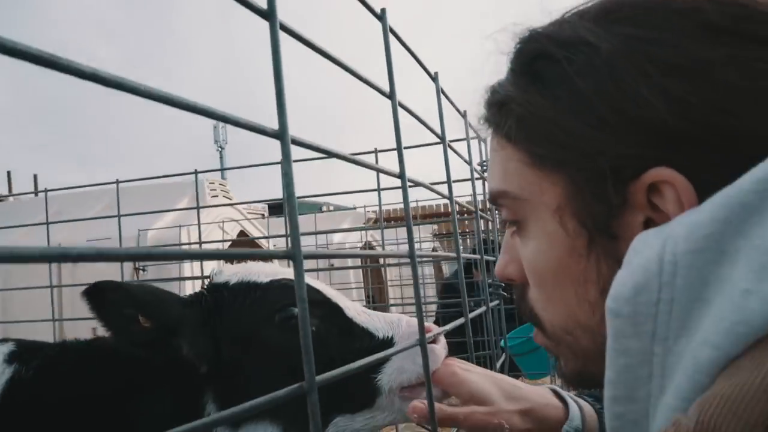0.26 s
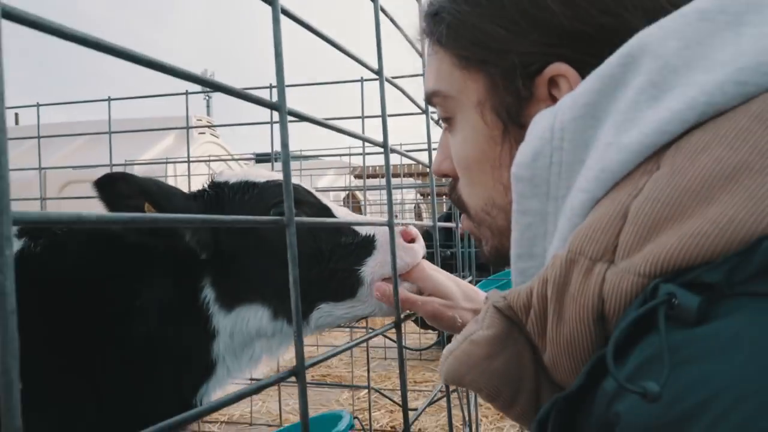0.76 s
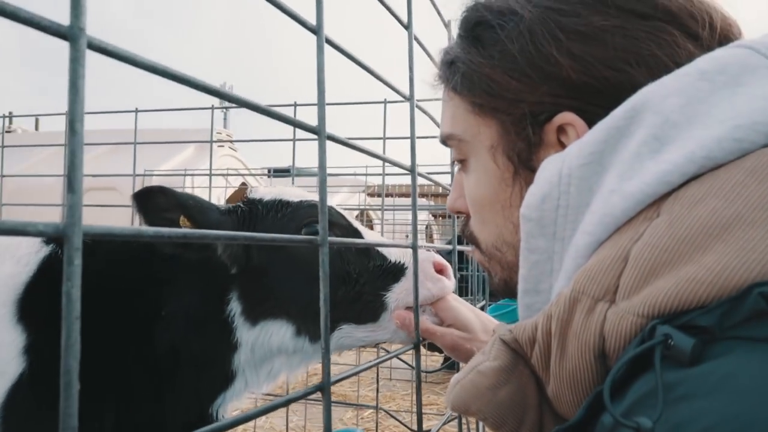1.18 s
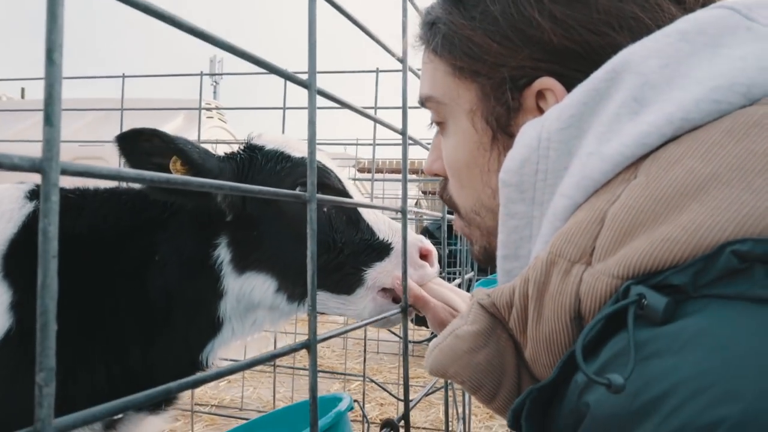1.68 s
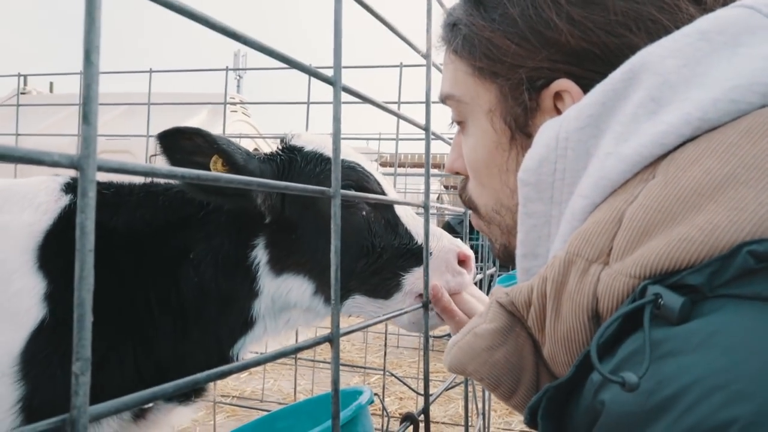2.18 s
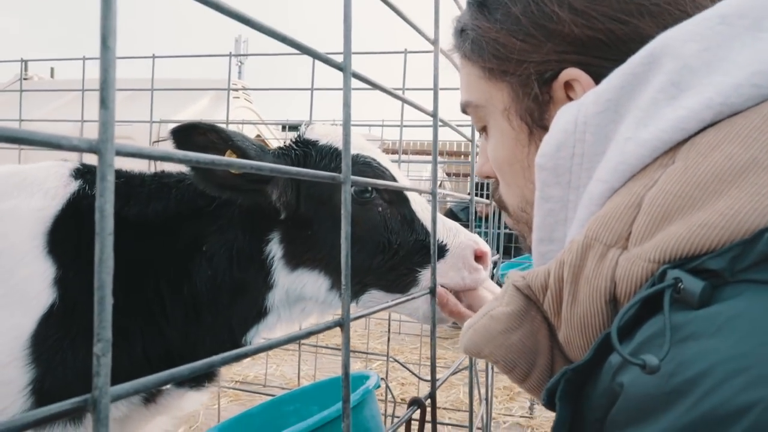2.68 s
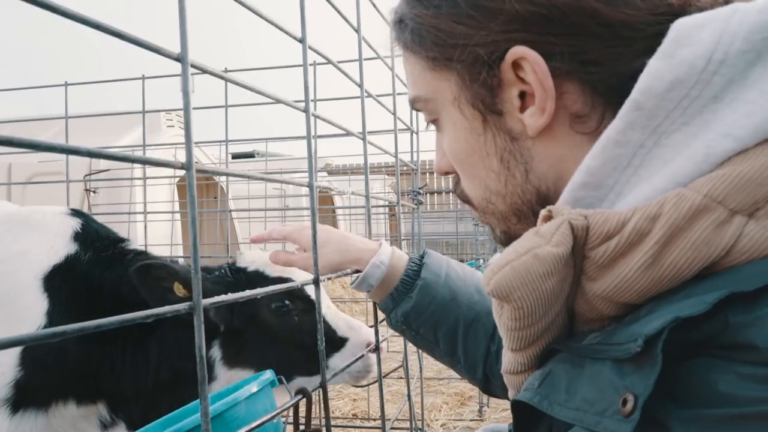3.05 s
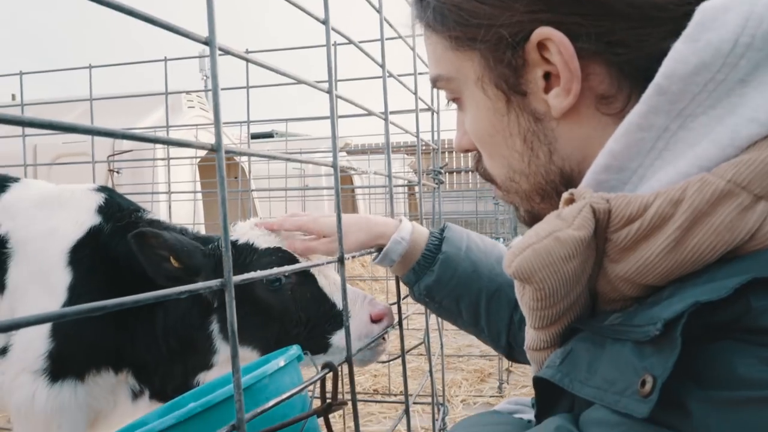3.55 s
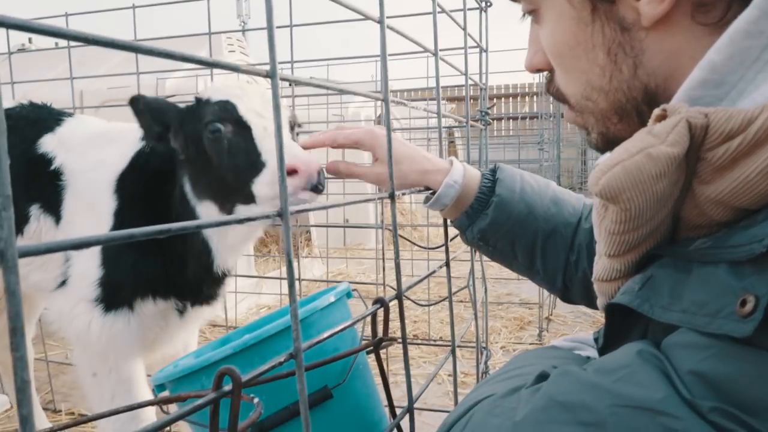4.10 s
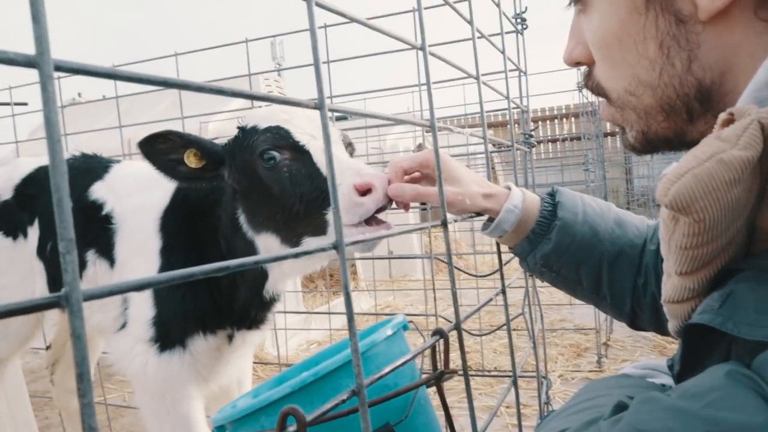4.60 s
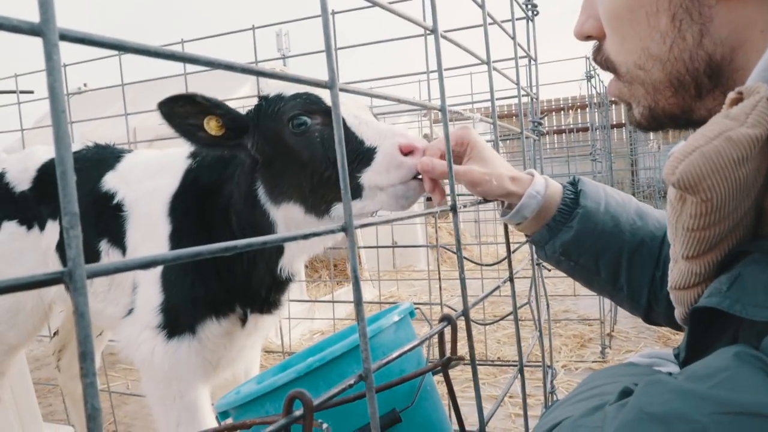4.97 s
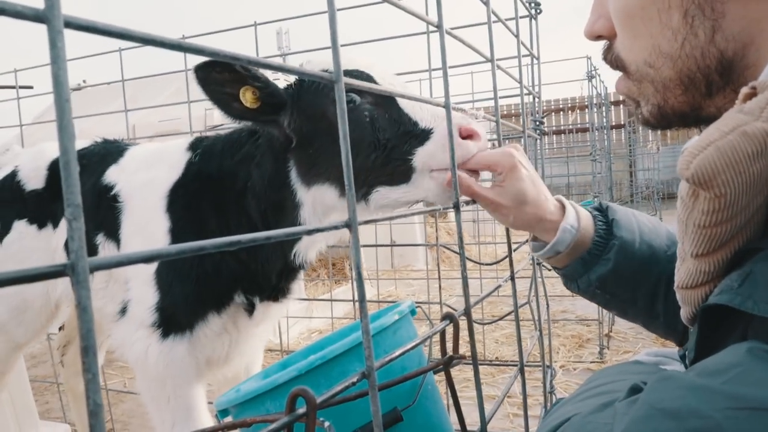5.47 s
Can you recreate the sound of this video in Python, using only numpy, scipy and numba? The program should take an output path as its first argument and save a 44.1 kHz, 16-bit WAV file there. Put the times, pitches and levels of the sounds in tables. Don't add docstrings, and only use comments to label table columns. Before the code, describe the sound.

Outdoor farmyard on a small bare camera microphone. Strong low wind buffeting opens, with hard fence-wire knocks and crisp straw ticks close by over a distant machine hum and rustling. Wind eases, a hoof thuds heavily, then a nearby calf creaks and gives one short, nasal, opening moo while the background ducks. Quiet yard noise returns.

```python
import sys
import numpy as np
from scipy import signal
from scipy.fft import rfft, irfft, next_fast_len
from scipy.io import wavfile
from scipy.ndimage import uniform_filter1d
from numba import njit

SR = 44100
rng = np.random.default_rng(int(sys.argv[2]) if len(sys.argv) > 2 else 0)


def volts(x):
    e = np.asarray(x, float) / 20
    return 10 ** e


def pcm_store(signal):
    levels = np.round(np.clip(np.atleast_2d(signal), -1, 1) * 32767)
    wavfile.write(sys.argv[1], SR, levels.astype(np.int16).T)


N = 253134
T = np.arange(N) / SR


def columns(table):
    s, *rest = np.transpose(table)
    return [np.interp(T, s, c) for c in rest]


def unit(x):
    return x / np.sqrt(np.mean(x ** 2))


def noise():
    return rng.standard_normal(N)


def coloured(points):
    hz, db = np.transpose(points)
    size = next_fast_len(N)
    log_hz = np.log(np.fft.rfftfreq(size, 1 / SR) + 1)
    gain = volts(np.interp(log_hz, np.log(hz), db, left=-80))
    return unit(irfft(rfft(noise(), size) * gain, size)[:N])


def smooth_twice(x, size):
    return uniform_filter1d(uniform_filter1d(x, size), size)


def walk(rate):
    hold = int(SR / rate)
    return smooth_twice(np.repeat(rng.standard_normal(N // hold + 1), hold), hold)[:N]


def steady(x, span_s):
    power = np.abs(uniform_filter1d(x ** 2, int(span_s * SR)))
    return x / np.sqrt(power + 1.8e-5 * np.max(x ** 2))


def bump(s, half_s):
    return np.exp(-((T - s) / half_s) ** 2)


def passing(x, order, hz, kind):
    return signal.sosfilt(signal.butter(order, hz, kind, fs=SR, output="sos"), x)


@njit
def svf(x, hz, width):
    y, b, l = np.empty(len(x)), 0., 0.
    for i in range(len(x)):
        g, k = np.tan(np.pi * hz[i] / SR), width[i] / hz[i]
        v = (b + g * (x[i] + 1e-18 - l)) / (1 + g * (g + k))
        b, l, y[i] = 2 * v - b, l + 2 * g * v, k * v
    return y


def band(x, hz, width):
    return svf(x, np.full(N, 1. * hz), np.full(N, 1. * width))


# time in seconds, gain in dB.
DUCK = [(4.0, -1), (4.2, -6.5), (4.42, -12.5), (4.48, -24), (4.82, -20.5), (4.89, 0.5)]


def gain_db():
    return columns(DUCK)[0]


# time in seconds, level in dB.
GUST = [(0, -12), (.11, -9.5), (.2, -4), (.5, -2.5), (.7, -5.5), (.9, -10), (1.02, -8), (1.15, -23.5),
        (1.37, -9), (1.65, -21.5), (1.8, -14.5), (2.2, -22), (2.45, -16.5), (2.9, -21), (3.1, -17),
        (3.6, -13.5), (3.95, -10), (5.0, -23.5)]
# time in seconds, share from 0 to 1.
BUFFET = [(0, 1), (.13, 0), (.2, 1), (.68, 0), (.95, 0.8), (1.1, 0.01)]
# frequency in Hz, level in dB per Hz.
WIND_COLOUR = [(3, -32), (6, -15.5), (10, 10.5), (25, -1.5), (40, 2.5), (60, -26.5), (200, -48),
               (1000, -110)]


def wind():
    share = np.clip(columns(BUFFET)[0], 0, 1)
    shed_hz, crest_s = 10.2, .34
    shed = np.cos(2 * np.pi * shed_hz * (T - crest_s) + .2 * walk(8))
    mix = share * unit(shed) + (1 - 0.74 * share) * coloured(WIND_COLOUR)
    return volts(columns(GUST)[0] + gain_db()) * steady(mix, 0.25)


# time in seconds, level in dB.
WHINE_ON = [(.3, -20), (.9, 0), (2.98, 0), (3.03, -14)]


def whine_on_db():
    return columns(WHINE_ON)[0]


# centre in Hz, width in Hz, level in dB.
DRONE = [(99.43, 7.9, 0), (214.7, 9.2, -10), (304.4, 8, -18.5), (412, 23, -14)]
# time in seconds, peak in dB, half length in seconds.
SURGES = [(0.762, -21.5, 0.043), (1.19, -18.5, 0.15), (1.522, -17, 0.058), (1.712, -22, 0.15),
          (2.0, -15.5, 0.056), (2.198, -15.5, 0.088), (2.54, -15, .1), (2.879, -11, 0.14),
          (3.2, -20.5, 0.11), (3.495, -15, 0.22), (3.806, -16, 0.043), (3.917, -15.5, 0.029),
          (4.026, -14.5, 0.025), (4.13, -16.5, .04), (4.892, -14, 0.018), (5.068, -19.5, 0.13),
          (5.326, -22.5, 0.093), (5.487, -21, 0.087), (5.675, -15.5, 0.051)]


def drone():
    bands = [volts(db) * unit(band(band(noise(), hz, width), hz, width)) for hz, width, db in DRONE]
    hum, upper = bands[0], sum(bands[1:])
    surge = volts(-30 + gain_db())
    surge = surge + sum(volts(db) * bump(s, half_s) for s, db, half_s in SURGES)
    upper_level = volts(-20.5 + gain_db() + 1.3 * whine_on_db())
    return surge * steady(hum, 0.079) + upper_level * upper


# time in seconds, level in dB.
BUSTLE = [(0, -2), (.6, -5), (.85, 0), (1.3, -1.5), (2.5, 0), (3.2, 1.5), (3.95, 1.5), (4.95, -1.5),
          (5.74, -4)]
# frequency in Hz, level in dB per Hz.
YARD_COLOUR = [(30, -31.5), (50, -3), (130, -11.5), (260, -14), (430, -20), (700, -26), (1460, -33.5),
               (2700, -39.5), (3400, -36), (4400, -45.5), (5600, -52.5), (6200, -53), (7000, -57),
               (9500, -62.5), (10200, -71.5), (15800, -64.5)]
# time in seconds, dB over the yard, centre in Hz, half length in seconds.
STIRS = [
    (1.0, 3.5, 785, 0.19),
    (1.51, 6.5, 700, 0.084),
    (2.09, 3, 1480, 0.22),
    (2.746, 9.5, 2490, 0.032),
    (2.956, 5, 200, .15),
    (3.41, 6, 2860, 0.26),
    (5.462, 3.5, 3400, 0.073),
]


def yard():
    bustle_db = columns(BUSTLE)[0]
    base, out = coloured(YARD_COLOUR), 0
    treble_share, stir_octaves = 0.83, 0.9
    for hz in 60 * 2 ** np.arange(0, 8.1, .5):
        tilt = np.clip(np.log2(hz / 600) / 5.1, 0, 1)
        db = (1 - tilt + tilt * treble_share) * bustle_db
        db = db + 2.0 * walk(7.4) + 1.44 * walk(2.03)
        for s, up_db, centre, half_s in STIRS:
            nearness = np.exp(-(np.log2(hz / centre) / stir_octaves) ** 2)
            db = db + up_db * nearness * bump(s, half_s)
        out = out + volts(db) * band(base, hz, hz * 0.46)
    return volts(-25 + gain_db()) * out


# frequency in Hz, level in dB.
WHINE = [(4000, -66), (8000, -75), (11999, -79), (14998, -71)]


def whine():
    tones = sum(volts(db + 9) * np.sin(2 * np.pi * hz * T) for hz, db in WHINE)
    return tones * volts(whine_on_db())


def hits(table, width, body, boost_db, rise_s, hold_s):
    out, n = np.zeros(N), np.arange(4096)
    for s, db, hz, t60_s in table:
        grain = rng.standard_normal(len(n))
        centre, wide = np.full(len(n), 1. * hz), np.full(len(n), width * hz)
        bright = svf(svf(grain, centre, wide), centre, wide)
        low = svf(svf(grain, centre / 3, wide / 2), centre / 3, wide / 2)
        rise = np.minimum(n / SR / rise_s, 1)
        decay = volts(-60 * np.maximum(n / SR - hold_s, 0) / t60_s)
        burst = (bright + body * low) * rise * decay
        out[int(s * SR) + n] += burst / np.abs(burst).max() * volts(db + boost_db)
    return out


# start in seconds, peak in dB, centre in Hz, decay in seconds.
TICKS = [(0.0162, -34.5, 5450, 0.49), (0.1504, -36, 5100, 0.49), (0.2946, -34.5, 5350, 0.18),
         (0.7652, -33.5, 5540, 0.23), (0.8955, -42, 5130, 0.1), (1.1457, -32, 6860, 0.077),
         (1.2535, -36.5, 5040, 0.1), (1.275, -34.5, 5550, 0.14), (1.33, -45, 5530, 0.083),
         (1.3936, -29.5, 4900, 0.11), (1.523, -30, 6660, 0.11), (1.5574, -44, 5530, 0.25),
         (1.739, -27.5, 4860, 0.1), (1.7525, -41.5, 6900, 0.024), (2.0029, -36, 5200, 0.11),
         (2.2817, -32.5, 6560, 0.048), (2.399, -47, 5210, 0.12), (2.4864, -37.5, 5200, 0.096),
         (2.6703, -28.5, 5000, 0.034), (2.7413, -34, 5600, 0.15), (2.7894, -54, 5070, 0.1),
         (2.8566, -35, 5200, 0.13), (2.8894, -40, 5870, 0.11), (2.919, -51, 5100, 0.055),
         (2.9918, -38.5, 5250, 0.04), (3.0994, -60, 5270, 0.1), (3.6014, -41, 6670, 0.092),
         (5.3722, -44, 5000, 0.069)]


def straw_ticks():
    return hits(TICKS, 0.97, 3.8, boost_db=7.5, rise_s=0.0016, hold_s=.004)


# start in seconds, peak in dB, centre in Hz.
KNOCKS = [(0.2211, -27, 2100), (0.3215, -24, 2350), (0.3838, -34, 2800), (0.401, -13, 2070),
          (0.4094, -22, 1500), (0.5076, -25, 2200), (0.604, -18.5, 2160), (1.74, -14.5, 2970),
          (1.752, -24, 3370), (2.6694, -16, 4300), (2.708, -30, 1710), (2.736, -19, 3160),
          (2.7421, -20, 1750)]


def wire_knocks():
    rows = [(s, db, hz, 0.015) for s, db, hz in KNOCKS]
    return passing(hits(rows, 0.62, 1.3, boost_db=1.5, rise_s=0.0013, hold_s=0.0041), 4, 5600, "low")


# start in seconds, peak in dB, centre in Hz, decay in seconds.
THUDS = [
    (.67, -22, 132, 0.22),
    (3.625, -8, 147, 0.41),
]


def hoof_thuds():
    return hits(THUDS, 0.32, 0., boost_db=4, rise_s=0.0018, hold_s=0)


# time in seconds, pitch in Hz.
PITCH = [(4.19, 117.1), (4.244, 124.0), (4.3, 130.0), (4.388, 135.2), (4.53, 138.2), (4.7, 132.3),
         (4.786, 127.2), (4.826, 117.3), (4.87, 99.2)]
# time in seconds, pulse rate in Hz.
CREAK = [(4.017, 79.13), (4.05, 89.8), (4.062, 162.8), (4.16, 158.6), (4.18, 125.2)]
# time in seconds, period scatter from 0 to 1, throb in dB, breath in dB.
ROUGH = [(4.05, .03, 0, -20), (4.07, .2, 5, -7), (4.17, .17, 6, -8), (4.2, .004, 0, -18),
         (4.43, .002, 0, -23), (4.47, .0012, 0, -24), (4.815, .002, 0, -21), (4.86, .02, 0, -12),
         (4.88, .02, 0, -9)]


def throb(crest_s):
    return lambda t: np.cos(2 * np.pi * 51 * (t - crest_s))


def folds():
    hz = uniform_filter1d(columns(list(CREAK) + list(PITCH))[0], size=900)
    scatter, throb_db, _ = columns(ROUGH)
    chance = rng.standard_normal((400, 2))
    pulses, times, t = np.zeros(N), [], CREAK[0][0]
    tap = np.arange(-8, 9)
    while t < PITCH[-1][0]:
        i, k = int(t * SR), len(times)
        off = tap - (t * SR - i)
        size_db = 15 * scatter[i] * chance[k, 1] + throb_db[i] * throb(4.095)(t)
        pulses[i + tap] -= volts(size_db) * np.sinc(off) * np.cos(np.pi * off / 18) ** 2
        times.append(t)
        t += np.clip(1 + scatter[i] * chance[k, 0], .5, 2) / hz[int((t + .004) * SR)]
    return pulses, np.interp(T, times, np.arange(len(times)))


JAW = [(4.16, 0.5), (4.21, 1), (4.34, 2.08), (4.435, 2), (4.457, 3), (4.58, 3), (4.68, 4), (4.8, 4),
       (4.87, 5)]


def posture(*values):
    return np.interp(columns(JAW)[0], np.arange(len(values)), values)


# time in seconds, level in dB.
EFFORT = [(4.0, -16), (4.02, -21.5), (4.045, -27), (4.066, -18.5), (4.45, -16), (4.84, -16.5),
          (4.87, -16.5), (4.9, -21.5), (4.96, -55.5)]
# centre in Hz, width in Hz, level in dB.
SLACK = [(508, 350, -0.5), (1050, 970, 2.5), (1620, 250, -5), (2140, 350, -10), (2880, 400, -22),
         (3750, 600, -10.5), (4120, 390, -16)]
NOSE = [(453, 200, -0.5), (1140, 220, -4.5), (1710, 80, 2.5), (2280, 140, -14), (3100, 290, -17.5),
        (3500, 190, -10.5), (4050, 84, -11)]
STRAIN = [(513, 340, 1), (1380, 140, -4), (1756, 200, 0), (2060, 310, -12.5), (2760, 110, -15),
          (3425, 40, -5), (3980, 130, -16.5)]
OPEN = [(409, 59, -2.5), (1385, 259, 2), (1600, 113, 3), (2176, 93, -2.5), (2680, 76, -11),
        (3480, 240, -18.5), (3900, 400, -33)]
WIDE = [(542, 141, 0), (1440, 72, 1), (1810, 170, -3), (2386, 207, -1.5), (2900, 82, -12),
        (3400, 81, -11.5), (3770, 160, -22)]
CLOSING = [(473, 200, 0.5), (940, 260, -1), (1495, 100, 0.5), (2420, 110, -12.5), (2800, 580, -33.5),
           (3450, 200, -31), (3900, 400, -30)]
# start and end of their return, in seconds.
UNMUFFLE_S = [4.048, 4.062]
FLAP_DB = [-12, -4.5, -7.5, -14.5, -12, -4]
SINUS_DEPTH = [0.69, .95, 0.75, 0.23, 0.26, .5]


def throat(pulses, puff):
    effort_db, breath_db, out = columns(EFFORT)[0], columns(ROUGH)[2], 0
    swell = np.roll(smooth_twice(pulses, 6), -52)
    breath = volts(breath_db - 12) * puff * band(noise(), 4000, 5000)
    source = pulses - 0.23 * swell + breath
    signs = [-1, 1, -1, -1, -1, -1, 1]
    for sign, rows in zip(signs, zip(SLACK, NOSE, STRAIN, OPEN, WIDE, CLOSING)):
        hz, width, db = (posture(*column) for column in zip(*rows))
        db = db + (hz > 2500) * np.interp(T, UNMUFFLE_S, [-9, 0])
        per_pulse = SR / np.sqrt(np.pi * width * 135)
        out = out + sign * volts(effort_db + db) * per_pulse * svf(source, hz, width)
    out = out - 6 * volts(posture(*FLAP_DB) + effort_db + 14) * np.roll(swell, 26)
    out = out - np.clip(posture(*SINUS_DEPTH), 0, 1) * band(out, 4540, 550)
    return passing(passing(out, 2, 240, "high"), 6, 4500, "low")


# time in seconds, level in dB.
AIRY_TOP = [(4.04, -27), (4.065, 0.5), (4.455, -4), (4.48, -29), (4.53, -25), (4.6, 0.5), (4.67, -13.5),
            (4.79, 2.5), (4.85, -21.5)]
HUM_DB = [2, 5, 1, -18, -20.5, -11]
FIVE_DB = [-19.5, -21, -28, -23.5, -21, -32]


def calf():
    pulses, phase = folds()
    _, throb_db, breath_db = columns(ROUGH)
    effort_db, airy_db = columns(EFFORT)[0], columns(AIRY_TOP)[0]
    voiced = (T > CREAK[0][0]) & (T < PITCH[-1][0])
    puff = np.where(voiced, np.exp(-(phase % 1) / .7), .6)
    puff = puff * volts(throb_db * throb(4.097)(T))
    out = throat(pulses, puff)
    five = steady(band(band(out, 5340, 500), 5300, 700), 0.064)
    five = five * volts(posture(*FIVE_DB) + .4 * airy_db)
    edge = pulses + volts(breath_db - 4) * puff * noise()
    air = band(edge, 6750, 600) - band(edge, 8100, 900)
    air = air + 0.24 * band(edge, 11200, 1200) - .15 * band(edge, 13800, 3000)
    air = volts(-29.5 + airy_db) * steady(passing(air, 4, 6500, "high"), .05)
    hum = np.sin(2 * np.pi * (phase + .4))
    hum = hum * uniform_filter1d(1. * voiced, size=400) * volts(posture(*HUM_DB))
    call = out + volts(effort_db) * (hum + five + air)
    n = np.arange(int(.15 * SR))
    smear = rng.standard_normal(len(n)) * volts(-60 * n / SR / .22) * (n > .004 * SR)
    sounding = (T > 4.0) & (T < 4.96)
    return call * sounding + volts(-46) * signal.fftconvolve(out * sounding, smear)[:N]


def scene():
    air = wind() + drone() + yard() + whine() + straw_ticks() + hoof_thuds()
    return (0.8 * np.tanh(air / 0.96) + wire_knocks() + calf())[None]


def top_cut(x):
    return signal.sosfilt(signal.butter(12, 15830, fs=SR, output="sos"), x)


def record(dry):
    housed = dry - .9 * band(dry[0], 6150, 500)
    limited = np.clip(1.617 * np.tanh(housed / 1.785), -1, 1)
    return top_cut(limited)


dry = scene()
out = record(dry)
pcm_store(out)
```